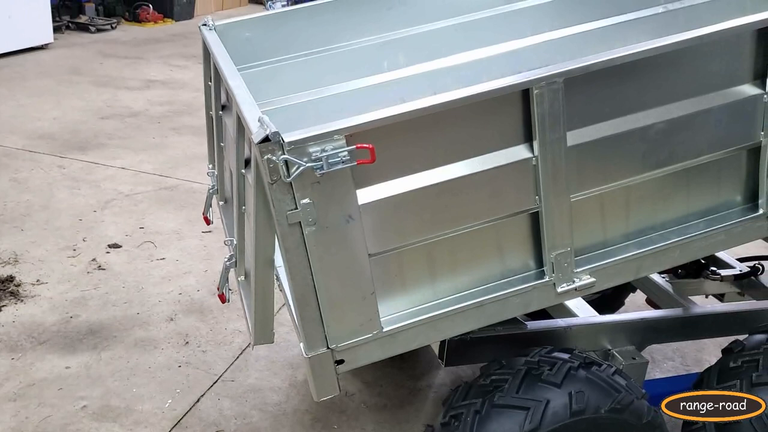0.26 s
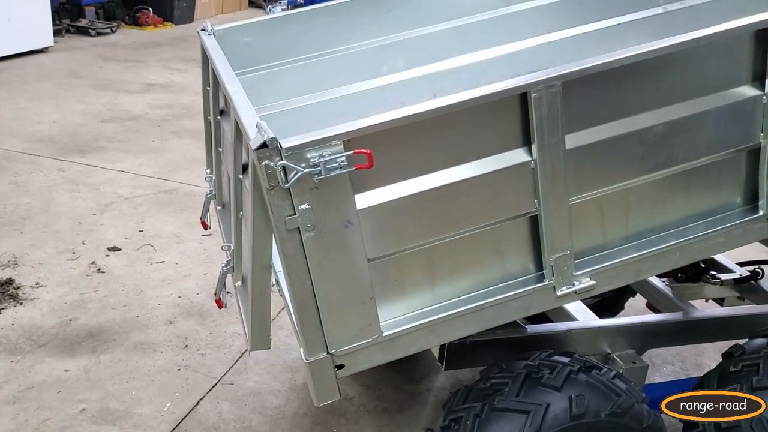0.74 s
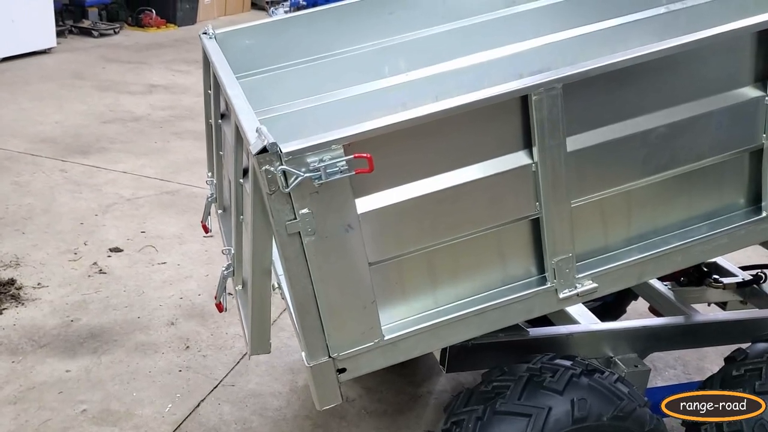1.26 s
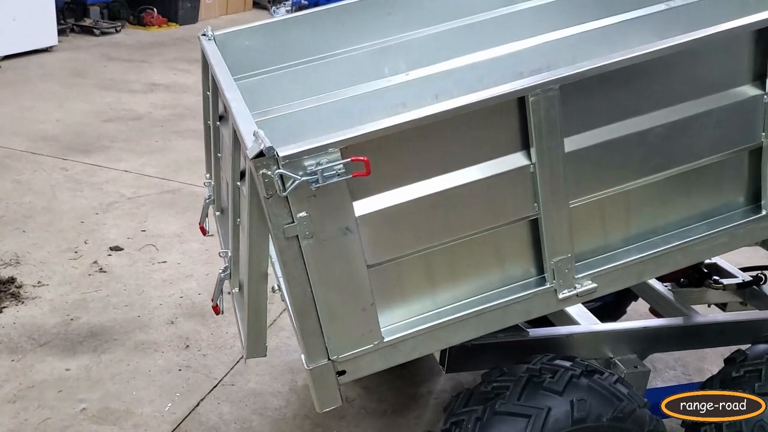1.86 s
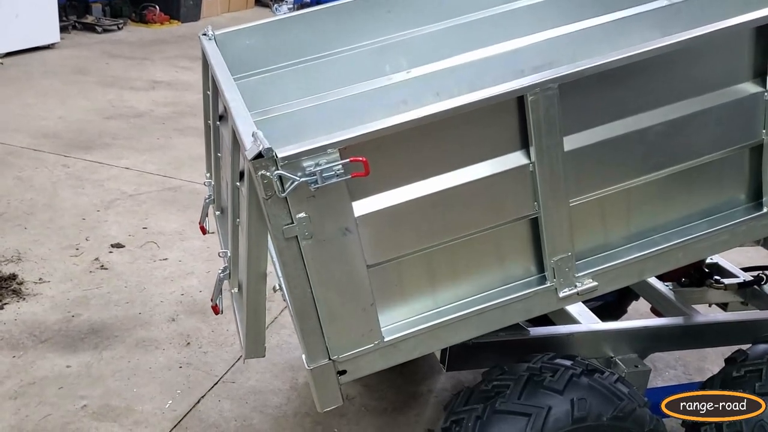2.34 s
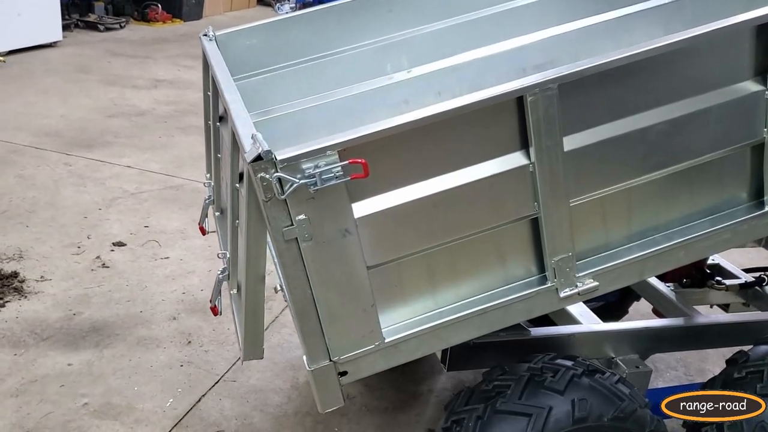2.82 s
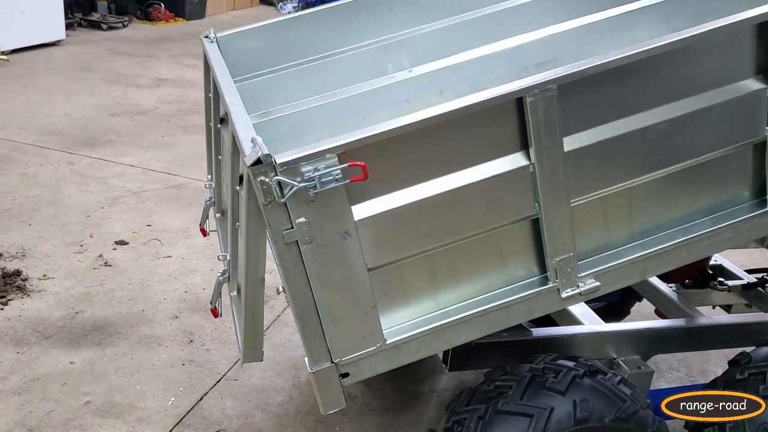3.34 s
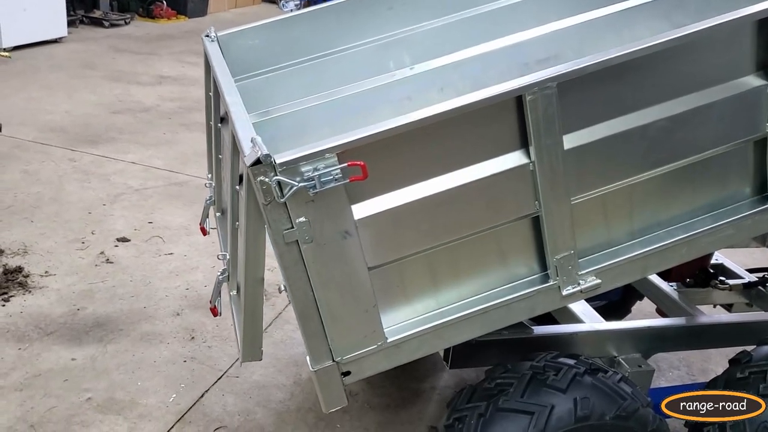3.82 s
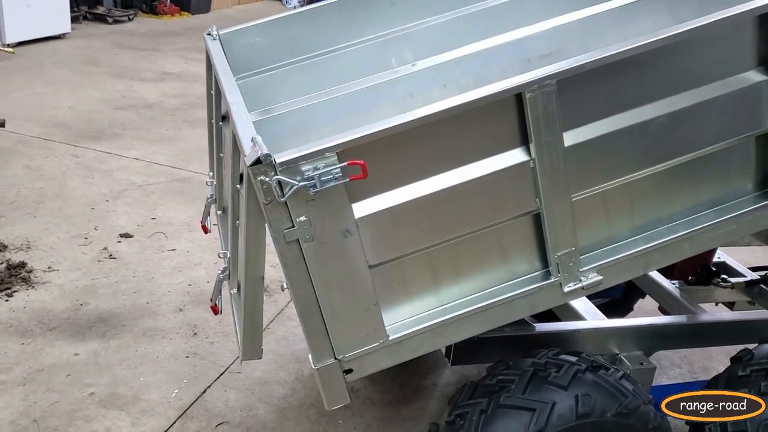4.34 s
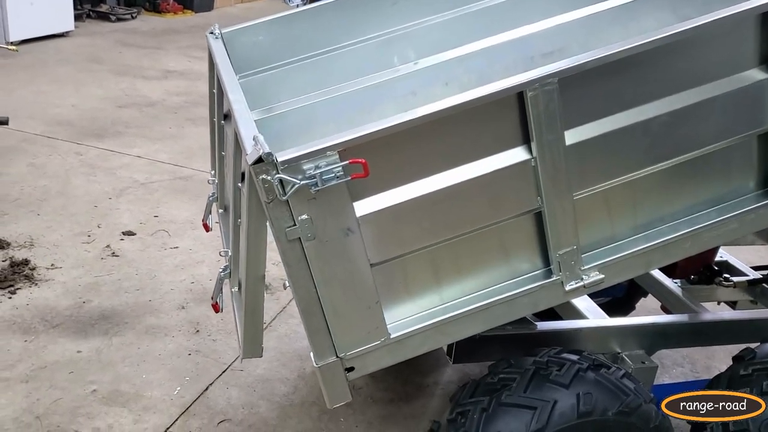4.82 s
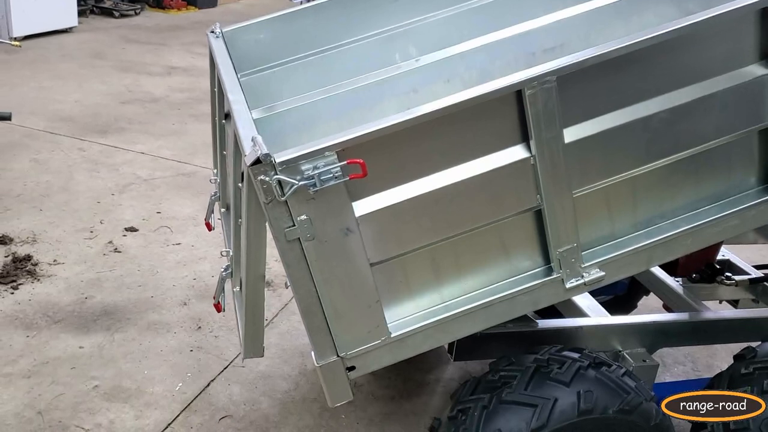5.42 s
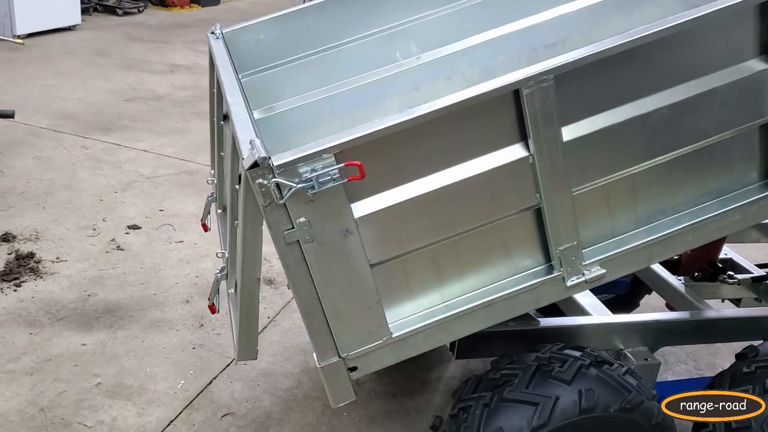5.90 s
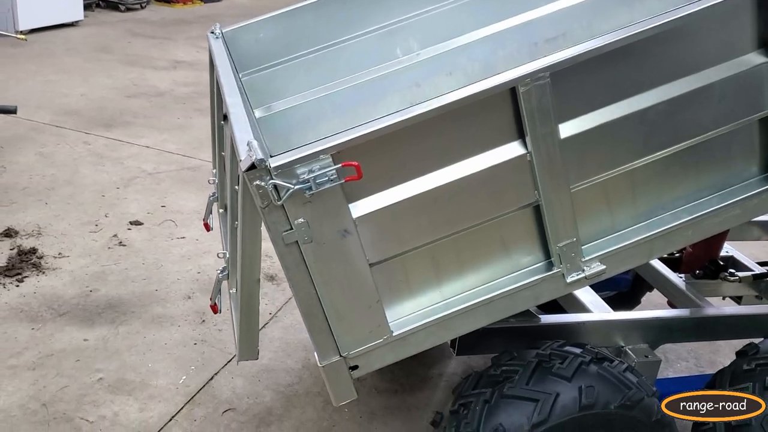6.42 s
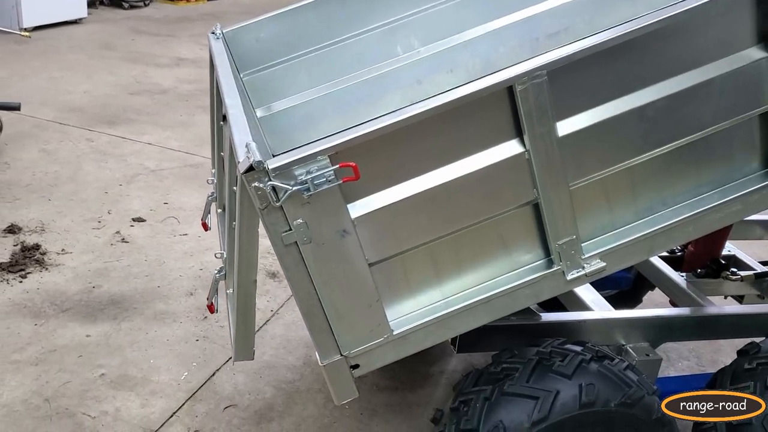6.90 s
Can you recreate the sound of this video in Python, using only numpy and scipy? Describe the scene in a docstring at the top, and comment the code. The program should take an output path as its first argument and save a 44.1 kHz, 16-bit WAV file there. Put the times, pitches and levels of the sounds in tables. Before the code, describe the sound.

An electric hydraulic pump whines steadily with hiss in a workshop, then a steel trailer box thumps and the strained whine sags into low rumbling drumming.

```python
"""An electric gear pump whines on the orders of its shaft, hissing, left of a stereo camera microphone.
A trailer's steel box, lifted in a workshop, rumbles at idle; a few short scrapes sound nearby.
The box thumps and drums in bouts while the loaded motor sags; then the motor settles slower and the
box drums on. Whine: a slowly changing waveform read once a shaft turn; thump: ringing frame modes;
rumble, hiss and scrapes: coloured stereo noise."""
import sys
import numpy as np
from scipy import signal
from scipy.fft import rfft, irfft, next_fast_len
from scipy.io import wavfile
from scipy.ndimage import uniform_filter1d, map_coordinates

SR = 44100
rng = np.random.default_rng(int(sys.argv[2]) if len(sys.argv) > 2 else 0)


def generate_wav(sig):
    """Save sig (samples, or channels by samples) to the path in sys.argv[1] as 16-bit PCM at SR."""
    pcm = np.round(np.clip(np.atleast_2d(sig).T, -1, 1) * 32767).astype(np.int16)
    wavfile.write(sys.argv[1], SR, pcm)


N = 315315

# Shaft creeps up, sags under load, settles slower. Each row: time in seconds, speed in turns per second.
SHAFT_SPEED = [(0, 60.2), (2, 60.25), (4.4, 60.29), (4.6, 60.28), (4.9, 60.07), (5.05, 59.85), (5.24, 59.5),
               (5.35, 59.45), (5.45, 59.58), (5.56, 59.85), (5.65, 59.92), (7.15, 59.94)]
# Start and end in seconds of the change from the fast pattern of orders to the slow one.
SAG_SPAN_S = (4.34, 5.74)
# The pump's lead at the left ear. Each row: frequency in Hz, left over right in dB.
LEFT_LEAD = [(300, 9), (700, 4), (2000, 3.5), (5000, 7.5), (9000, -1), (15000, 4.5)]


def amp(db):
    """Gain of a level in dB."""
    return 10 ** (np.asarray(db) / 20)


def unit(x):
    """x at rms 1."""
    return x / np.sqrt(np.mean(x ** 2) + 1e-20)


def along(points, hz):
    """(Hz, value) points interpolated on a log frequency axis."""
    point_hz, value = np.transpose(points)
    return np.interp(np.log(hz + 1), np.log(point_hz + 1), value)


def curves(rows, t=None):
    """One value per time (default: per sample) for each column after the first."""
    row_s, *columns = np.transpose(rows)
    at_s = np.arange(N) / SR if t is None else t
    return [np.interp(at_s, row_s, column) for column in columns]


def filtered(x, response):
    """x times a zero-phase response of frequency."""
    size = next_fast_len(N + SR // 2)
    hz = np.fft.rfftfreq(size, 1 / SR)
    return irfft(rfft(x, size) * response(hz), size)[..., :N]


def ear_gains(hz):
    """Left and right gains of the pump's side: half the lead up, half down."""
    return amp(np.outer([.5, -.5], along(LEFT_LEAD, hz)))


def rush(level_db, patchy_db):
    """Stereo noise, mid at rms 1, coloured by level_db(hz), with time-frequency patches of random gain."""
    # Each row: frequency in Hz, left-right correlation.
    likeness = [(60, .995), (130, .99), (290, .95), (640, .5), (1400, 0), (15000, .05)]
    bins = signal.stft(rng.standard_normal((2, N)), nperseg=512)[2]
    field = uniform_filter1d(rng.standard_normal(bins.shape[1:]), 6, 0)
    field = uniform_filter1d(field, 12, 1)
    pair = signal.istft(bins * amp(patchy_db * unit(field)), nperseg=512)[1][:, :N]

    def mid_side(hz):
        # mid and side shares that give the wanted correlation
        turn = np.arccos(np.clip(along(likeness, hz), -1, 1)) / 2
        return amp(level_db(hz)) * [np.cos(turn), np.sin(turn)]

    mid, side = filtered(pair, mid_side)
    return np.array([mid + side, mid - side]) / np.std(mid)


def drift(t, rate, count):
    """Smooth complex chance of mean power 1, shaped (ear, order, time), with rate knots a second."""
    knots = rng.standard_normal((2, 2, count, int(t[-1] * rate) + 3))
    left = (t * rate).astype(int)
    part = np.sin(t * rate % 1 * np.pi / 2)
    smooth = knots[..., left] * np.sqrt(1 - part ** 2) + knots[..., left + 1] * part
    return (smooth[0] + 1j * smooth[1]) / np.sqrt(2)


def pump(count=263, size=4096, rate=60):
    """Gear whine: one shaft turn is a waveform, reshaped rate times a second, read at the shaft's speed."""
    # Strong orders when fast. Each row: order, left dB, right dB, left lead in rad, swell in dB per second.
    # Orders 10 and 40 take only their ear balance from here; whine sets their level.
    fast_rows = [(10, -31, -39, 0.3, 0.8), (20, -50, -49, 0.5, -0.2), (28, -43, -49, -1.4, 1.4),
                 (30, -46, -53, -1.4, -2.0), (36, -52, -60, 0.8, 0.2), (37, -48, -59, -0.7, 0.2),
                 (38, -49, -51, -0.6, -0.5), (39, -47, -51, 2.0, -0.5), (40, -30, -36, -0.5, 0.4),
                 (41, -46, -48, -1.8, 2.0), (42, -47, -49, 1.2, -0.3), (43, -49, -55, 2.3, 1.2),
                 (44, -47, -57, 2.9, -2.0), (46, -48, -60, 2.9, -0.8), (48, -50, -55, 1.1, 0.4),
                 (50, -44, -49, 1.8, 2.0), (55, -46, -50, 2.0, -1.4), (56, -43, -51, 1.9, -1),
                 (59, -48, -55, 0.2, 1.5), (60, -50, -57, 0.7, 0.3), (62, -47, -63, 2.8, 1.0),
                 (64, -50, -59, 1.6, 1.1), (70, -56, -67, 0.9, 0), (72, -48, -60, 2.7, 0.9),
                 (78, -49, -55, 0.9, 0.1), (79, -51, -59, -1.4, 0.1), (80, -43, -53, -1.0, -1.5),
                 (82, -53, -58, 1.2, 0.4), (83, -49, -60, 0.5, 1.9), (84, -46, -59, 1.2, 2.0),
                 (90, -53, -54, -1.6, -0.1), (100, -54, -60, -1.9, 1.8), (108, -53, -62, 3.1, -1.6),
                 (110, -57, -69, -1.8, 0), (111, -46, -57, 0.5, -0.4), (112, -50, -60, 1.0, -1.6),
                 (130, -53, -51, -1.6, -0.7), (190, -53, -56, -1.5, 1.3), (230, -54, -57, 0.8, 0.5)]
    # Strong orders once settled slower. Each row: order, left dB, right dB, left lead in rad.
    slow_rows = [(10, -41, -50, 2.7), (20, -42, -49, -3.0), (28, -46, -65, -2.4), (30, -40, -45, -2.9),
                 (37, -46, -50, 2.0), (38, -45, -50, -0.0), (39, -49, -51, 0.8), (40, -35, -35, -1.7),
                 (41, -44, -44, 0.7), (42, -43, -40, -3.1), (43, -48, -57, 2.3), (46, -47, -59, 1.9),
                 (48, -51, -58, 1.4), (50, -44, -47, -2.7), (54, -49, -63, -2.0), (55, -45, -47, -1.2),
                 (56, -42, -48, -2.4), (60, -46, -51, -0.9), (62, -47, -56, -2.7), (64, -50, -65, 1.1),
                 (70, -50, -60, 2.2), (72, -45, -61, -0.8), (79, -52, -55, -0.6), (80, -51, -48, -1.8),
                 (82, -53, -60, 0.3), (83, -46, -56, 1.3), (90, -50, -58, 1.8), (84, -54, -62, 1.2),
                 (108, -52, -69, 0.4), (111, -49, -58, 2.8), (180, -55, -59, -1.1), (200, -51, -53, -1.1),
                 (220, -52, -60, 1.3)]
    # Fast strong orders drop as the load shifts. Each row: time in seconds, trim in dB.
    slack = [(4.56, 0), (4.76, -12)]
    # Two loudest tones. Each row: time in seconds, tooth tone (order 10) in dB, its fourth multiple in dB.
    whine = [(0, -38.5, -39.5), (1.3, -33.5, -33), (2.2, -34, -30.5), (3.1, -33.5, -31.5), (4.06, -33, -36),
             (4.62, -31.5, -34.5), (4.72, -33.5, -42), (4.81, -32, -37.5), (4.95, -36.5, -46),
             (5.12, -36, -40), (5.21, -45, -51), (5.55, -46, -44), (5.7, -51.5, -38), (7.15, -45, -40)]
    # Single orders swell and fade. Each row: centre in seconds, order, half length in seconds, level in dB.
    swells = [(0, 42, 0.81, -39), (1.9, 70, 0.98, -48.5), (2.52, 110, 0.93, -42), (3.0, 42, 0.65, -43.5),
              (3.602, 56, 1, -41.5), (4.652, 55, 0.13, -47), (4.652, 80, 0.18, -45),
              (4.707, 56, 0.07, -38.5), (4.74, 41, 0.089, -39), (4.8, 42, .12, -35.5),
              (4.907, 30, 0.18, -44), (4.938, 39, 0.072, -46), (4.95, 110, 0.89, -45.5),
              (5.03, 40, 0.065, -44), (5.06, 42, 0.072, -36.5), (5.274, 10, 0.035, -37.5),
              (5.278, 56, 0.045, -43), (5.3, 42, 0.054, -34.5), (5.287, 40, 0.014, -30),
              (5.388, 40, 0.052, -30), (5.426, 10, 0.032, -34), (5.612, 40, 0.011, -31.5),
              (5.7, 56, .12, -43), (5.745, 55, .25, -52), (7.05, 39, 0.3, -43.5), (7.1, 50, .3, -43.5),
              (7.1, 80, .2, -53), (5.22, 70, 0.25, -49), (5.75, 90, .3, -53)]
    t = np.arange(int(N / SR * rate) + 2) / rate
    wander = drift(t, rate=.8, count=count)[0] * np.sqrt(2)
    phase = order_phases(t, wander.real)
    change = np.clip((t - SAG_SPAN_S[0]) / (SAG_SPAN_S[1] - SAG_SPAN_S[0]), 0, 1)
    slack_db, = curves(slack, t)
    fast = pattern(fast_rows, t, phase, slack_db)
    slow = pattern(slow_rows, t, phase, 0 * t)
    sizes = (1 - change) * fast + change * slow
    # rate of pitch slide, turns per second squared
    slide = uniform_filter1d(abs(np.gradient(curves(SHAFT_SPEED, t)[0], t)), size=16)
    flicker = order_flicker(t, slide, wander.imag)
    for order, db in zip((10, 40), curves(whine, t)):
        sizes[:, order] *= amp(db) / abs(sizes[:, order].mean(0))
        depth = .08 + .14 * slide + .1 * change
        flicker[:, order] = 1 + depth * drift(t, rate=14, count=1)[:, 0]
    sizes = sizes * flicker
    # swelling orders keep the fast pattern's left-right balance until late in the sag
    shape = (1 - change) * fast / amp(slack_db) + change ** 3 * slow
    shape = shape / np.sqrt(np.mean(abs(shape) ** 2, axis=0) + 1e-20)
    for centre_s, order, half_s, db in swells:
        order = round(order)
        sizes[:, order] += shape[:, order] * amp(db) * np.exp(-((t - centre_s) / half_s) ** 2)
    # sizes are rms: each order's sine peaks sqrt(2) higher
    turns = irfft(np.swapaxes(sizes, 1, 2), size) * size / np.sqrt(2)
    angle = np.cumsum(curves(SHAFT_SPEED)[0]) / SR % 1 * size
    read_at = [np.arange(N) / SR * rate, angle]
    # the first point is repeated at the end to close the turn
    return np.array([map_coordinates(np.append(ear, ear[:, :1], 1), read_at, order=1) for ear in turns])


def order_phases(t, wander):
    """Neighbouring orders nearly in step, high ones less, so each band throbs once a turn at its own moment."""
    # Neighbours of the loud order 40 fall out of step, its throb eases. Each row: time in seconds, rad.
    throb = [(0, .6), (6.0, .8), (6.6, 2.3), (7.15, 3.1)]
    wander_rad = 1.3
    count = len(wander)
    in_step = np.cumsum(np.cumsum(rng.normal(0, .3, count)))
    scatter = rng.normal(0, 1, count) * (.6 + (np.arange(count) / 60) ** 2)
    phase = (in_step + scatter)[:, None] + wander_rad * wander
    phase[39] = 2 * phase[40] - phase[41] + curves(throb, t)[0]
    return phase


def pattern(rows, t, phase, trim_db):
    """Complex size of every order at both ears: weak ones wander at random, strong ones are listed."""
    # Weak orders in between. Each row: frequency in Hz, rms level of each order in dB, mean of the ears.
    weak = [(400, -95), (900, -64), (1400, -57.5), (1980, -65), (2400, -50), (3500, -62), (5000, -67.5),
            (6000, -71.5), (6800, -57.5), (7500, -85), (9800, -83), (11500, -63.5), (15700, -61.5)]
    hz = np.arange(len(phase)) * SHAFT_SPEED[0][1]
    weak_size = amp(along(weak, hz)) * ear_gains(hz)
    size = weak_size[..., None] * drift(t, rate=0.42, count=len(phase))
    # swells run until the sag starts, level zero halfway
    swell_s = np.minimum(t, SAG_SPAN_S[0]) - SAG_SPAN_S[0] / 2
    for order, left_db, right_db, lead_rad, *swell in rows:
        swell_db = sum(swell) * swell_s
        ears = amp([left_db, right_db]) * np.exp(1j * np.array([lead_rad, 0]))
        # the ears' sum gets phase 0
        ears = ears * np.exp(-1j * np.angle(ears.sum()))
        size[:, int(order)] = ears[:, None] * amp(swell_db + trim_db) * np.exp(1j * phase[int(order)])
    return size


def order_flicker(t, slide, wander):
    """While the pitch slides, the orders flicker in level, more strongly on faster slides."""
    depth_per_slide, sag_lift_db, wander_db = .5, 1.5, 1.1  # lift is per unit of slide depth
    count = len(wander)
    # uneven turns smear the high orders most
    smear = .75 * (np.arange(count)[:, None] / count) ** 1.7
    stir = np.clip(0.071 + smear, 0, .95)
    slide_depth = np.clip(depth_per_slide * slide, 0, .95)
    flutter = drift(t, rate=14, count=count)
    shared_flutter = (.6 * flutter + .56 * flutter.sum(0)) / 1.29  # partly common to both ears
    flicker = np.sqrt(1 - stir ** 2) + stir * drift(t, rate=18, count=count)
    flicker = flicker * (np.sqrt(1 - slide_depth ** 2) + slide_depth * shared_flutter)
    return flicker * amp(wander_db * wander + sag_lift_db * slide_depth)


def bearing():
    """The bearing's rollers hum off the shaft's orders and fade out midway through the sag."""
    # Each row: multiple of shaft speed, rms level in dB.
    tones = [(8.12, -53), (19.54, -54)]
    turns = np.cumsum(curves(SHAFT_SPEED)[0]) / SR
    fade = np.clip((SAG_SPAN_S[0] + 0.85 - np.arange(N) / SR) / 0.22, 0, 1)
    hum = sum(amp(db) * np.sqrt(2) * np.sin(2 * np.pi * multiple * turns) for multiple, db in tones)
    return fade * hum


def box():
    """Idle rumble; floor panels drum over it in bouts that rise fast and fade, then drum on."""
    # Rumble colours. Each row: frequency in Hz, relative density in dB per Hz.
    quiet_colour = [(15, -39), (25, -19), (43, -4), (100, -0.5), (140, -12.5), (180, -2.5), (225, -9),
                    (320, -8.5), (410, -17), (485, -13), (560, -15), (730, -22.5), (1230, -120)]
    drum_colour = [(15, -44), (25, -24), (95, -4.5), (129, -5.5), (261, -4), (400, -13), (585, -18),
                   (769, -23), (1120, -27.5), (1500, -32), (1950, -26.5), (3300, -120)]
    # Floor panel resonances. Each row: frequency in Hz, width in Hz, lift in dB.
    panels = [(115, 25, 9.5), (158.4, 18.6, 9.5), (237, 20, 5), (308, 35, 3.5)]
    # Idle rumble. Each row: time in seconds, level in dB.
    idle = [(0, -41), (.9, -35), (1.4, -37.5), (2.6, -39.5), (3.9, -38), (4.32, -34), (4.45, -32.5),
            (4.6, -31.5), (5.2, -38), (7.15, -46)]
    # Bouts. Each row: start in seconds, length in seconds, level at the start in dB, fade in dB per second.
    bout_rows = [(4.47, 0.25, -24, 36), (5.28, 0.12, -30.5, 5), (5.381, 0.042, -24.5, 3)]
    # Drumming on. Each row: time in seconds, level in dB.
    drum = [(5.42, -23), (7.124, -23.5), (7.15, -24)]
    attack_s, release_s = 0.024, 0.024
    chop_db, chop_per_s = 1.3, 32  # the drumming is choppy
    t = np.arange(N) / SR
    drum_gain = amp(curves(drum)[0]) * np.clip((t - drum[0][0]) / release_s, 0, 1)
    for start_s, length_s, db, fade_db_per_s in bout_rows:
        rise = np.clip((t - start_s) / attack_s, 0, 1)
        fall = np.clip((start_s + length_s - t) / release_s + 1, 0, 1)
        drum_gain = drum_gain + amp(db - fade_db_per_s * (t - start_s)) * rise * fall
    chop = amp(chop_db * np.interp(t * chop_per_s, np.arange(400), rng.standard_normal(400)))

    def drum_db(hz):
        lift = sum(db / (1 + (2 * (hz - centre) / width) ** 2) for centre, width, db in panels)
        return along(drum_colour, hz) + lift

    quiet = rush(lambda hz: along(quiet_colour, hz), patchy_db=0.7)
    drumming = rush(drum_db, patchy_db=1.0)
    return amp(curves(idle)[0]) * quiet + drum_gain * unit(chop) * drumming


def thump():
    """A soft blow and its rebounds ring the frame's lowest modes."""
    # Each row: time in seconds, level in dB before a common 10.5 dB cut.
    blows = [(4.478, -9.5), (4.505, -23), (4.549, -24), (4.59, -21)]
    # Each row: mode frequency in Hz, relative level in dB, 60 dB decay time in seconds.
    frame = [(84.4, 2.5, 0.27), (161, 1.5, 0.17), (228, -1.5, 0.1), (247, 4, .04), (460, -3, 0.018)]
    build_cycles = 0.25  # time constant of each mode's onset
    out, t = np.zeros(N + SR), np.arange(SR // 2) / SR
    ring = np.zeros(len(t))
    for hz, db, t60_s in frame:
        onset = 1 - np.exp(-t * hz / build_cycles)
        ring += amp(db - 60 * t / t60_s) * onset * np.sin(2 * np.pi * hz * t)
    for start_s, db in blows:
        out[round(start_s * SR):][:len(t)] += amp(db - 10.5) * ring
    return out[:N]


def hiss():
    """Oil and brushes hiss between the orders: patchy noise, weighted by the pump's left-right balance."""
    # Each row: frequency in Hz, relative density in dB per Hz.
    colour = [(300, -9.5), (650, -1), (730, -21), (800, -4.5), (1300, -5.5), (1850, -4), (1975, -9),
              (2250, 1), (2500, 1.5), (4000, -3.5), (5100, -8), (5280, -4), (6100, -9.5), (6700, -10.5),
              (7200, -5.5), (7500, -12), (8400, -9), (9700, -13), (11500, -5.5), (15700, -11.5)]
    # Each row: time in seconds, level in dB.
    level = [(0, -39), (4.5, -38.5), (5.8, -39.5), (7.15, -42)]
    noise = rush(lambda hz: along(colour, hz), patchy_db=2.0)
    return amp(curves(level)[0]) * filtered(noise, ear_gains)


def scuffs():
    """Short scrapes, as of soles on concrete or grit in the box: noise that swells and fades."""
    # Each row: frequency in Hz, relative density in dB per Hz.
    colour = [(120, -30), (300, -8), (800, 1.5), (1500, -7), (4000, -11), (8000, -20)]
    # Each row: centre in seconds, half length in seconds, level in dB.
    strokes = [(.55, 0.24, -40), (0.864, 0.13, -38.5), (1.108, 0.22, -41), (1.71, 0.15, -36.5),
               (4.618, 0.22, -40.5)]
    t = np.arange(N) / SR
    gain = sum(amp(db) * np.exp(-((t - centre_s) / half_s) ** 2) for centre_s, half_s, db in strokes)
    return gain * rush(lambda hz: along(colour, hz), patchy_db=2.5)


def scene():
    """Pump, bearing, hiss, box, thump and scuffs together."""
    return pump() + bearing() + hiss() + box() + thump() + scuffs()


def record(dry):
    """The camera cuts deep bass and keeps nothing above its band limit."""
    top_hz, bass_hz = 15740, 37.5  # half amplitude at bass_hz
    return filtered(dry, lambda hz: (hz < top_hz) * hz ** 4 / (hz ** 4 + bass_hz ** 4))


dry = scene()
out = record(dry)
generate_wav(out)
```